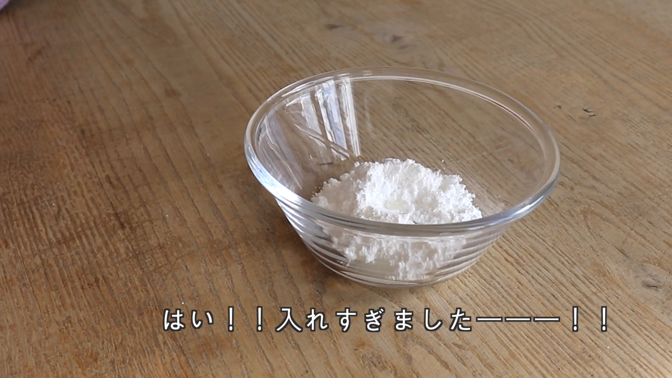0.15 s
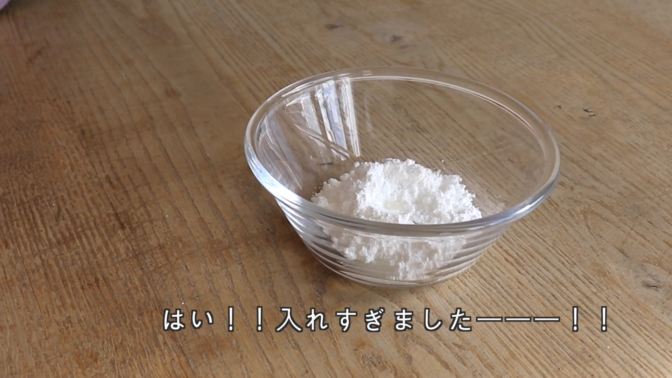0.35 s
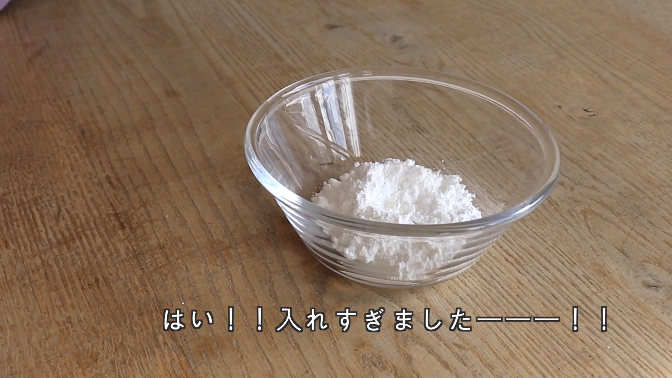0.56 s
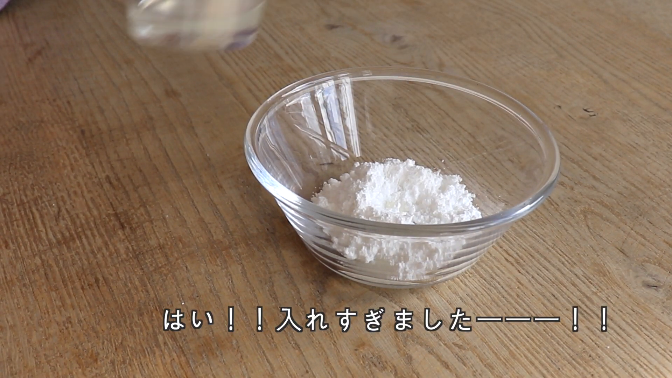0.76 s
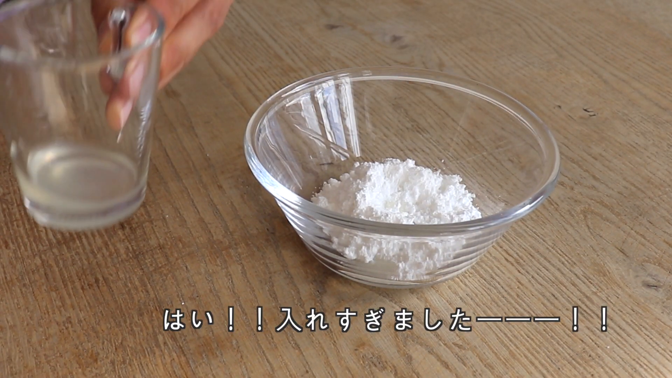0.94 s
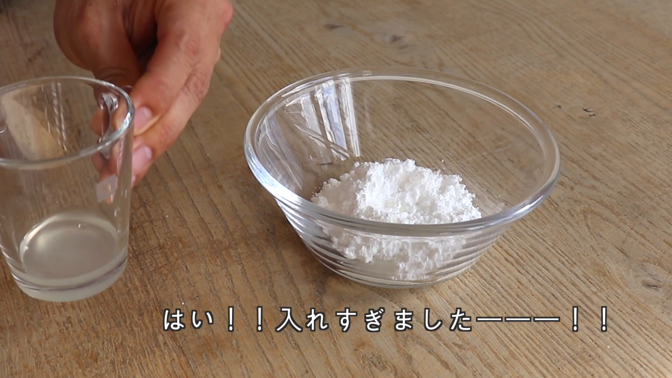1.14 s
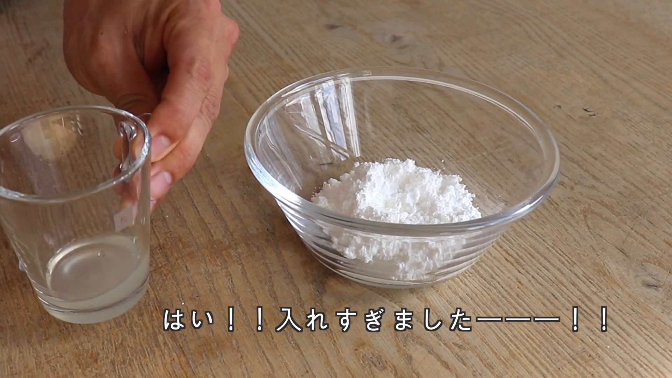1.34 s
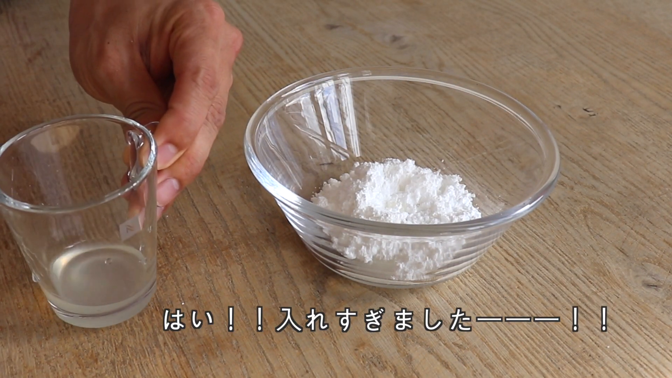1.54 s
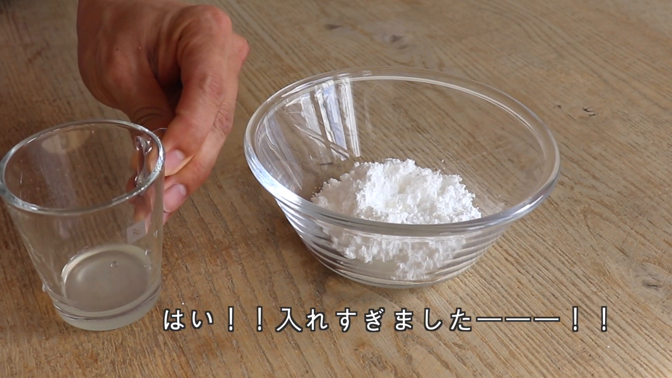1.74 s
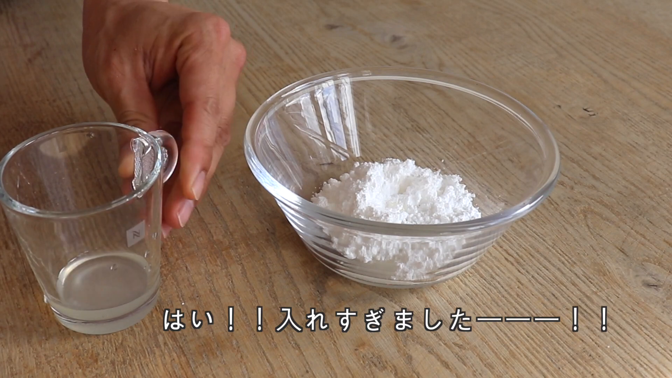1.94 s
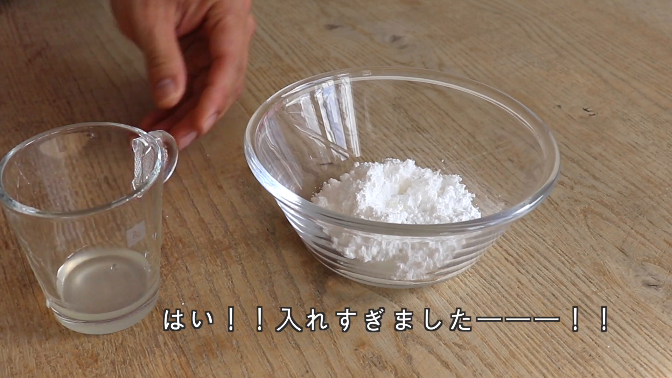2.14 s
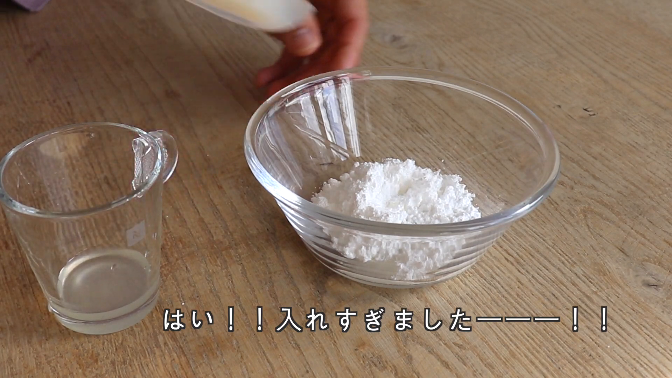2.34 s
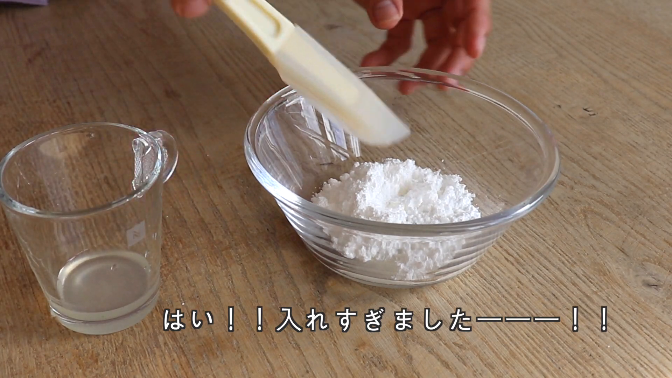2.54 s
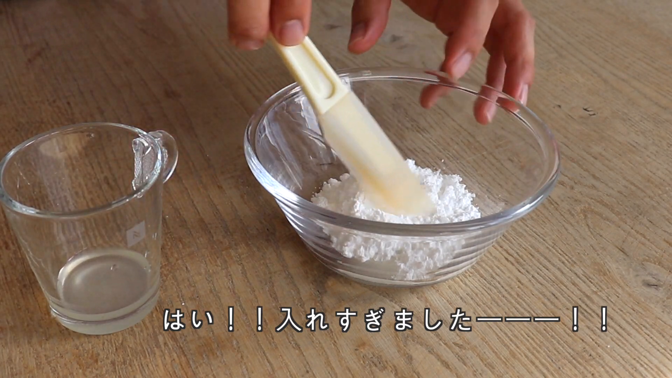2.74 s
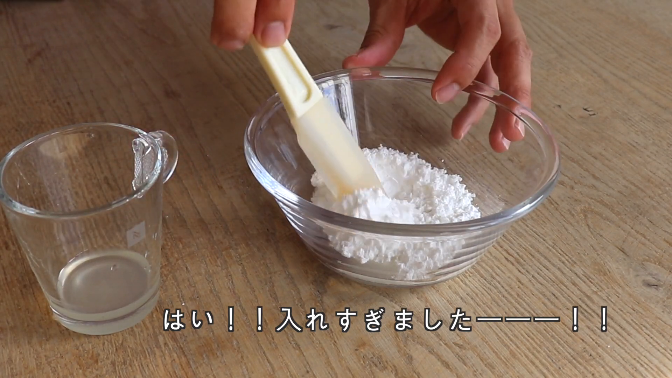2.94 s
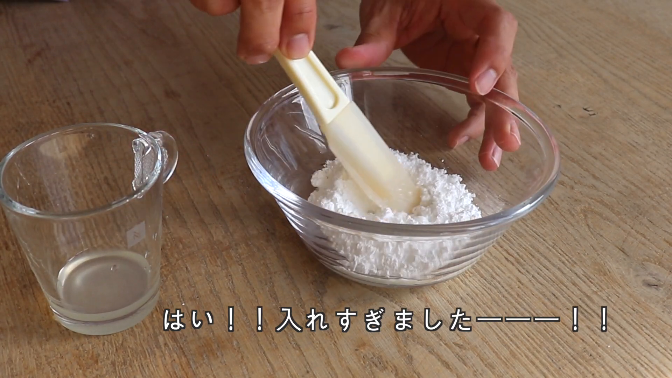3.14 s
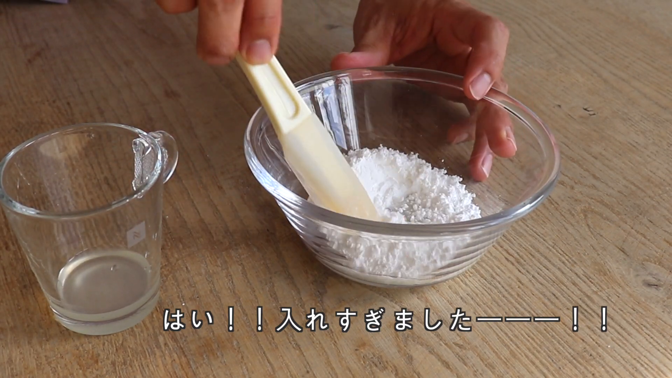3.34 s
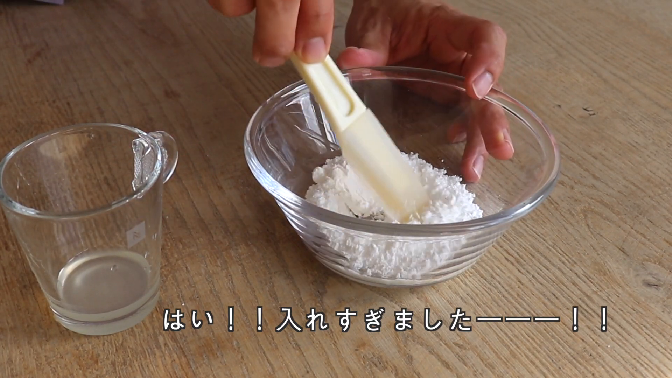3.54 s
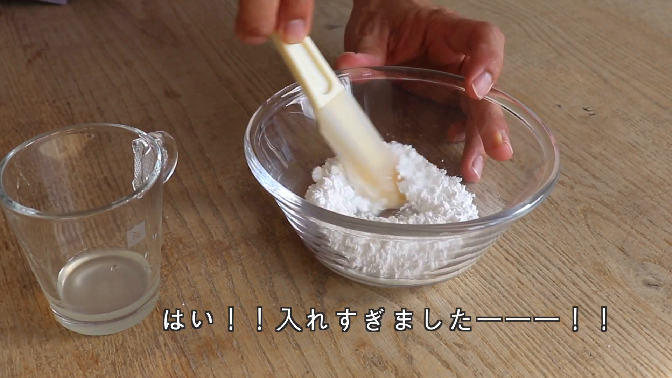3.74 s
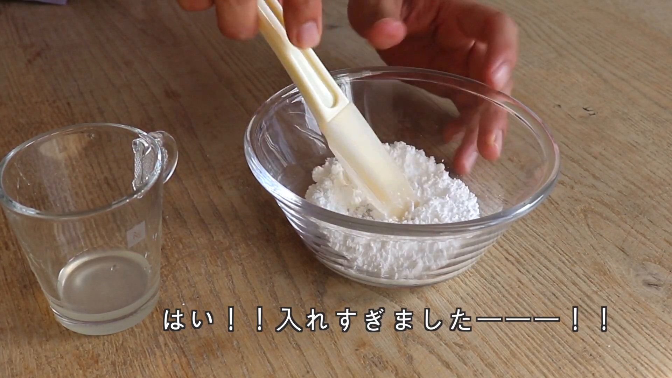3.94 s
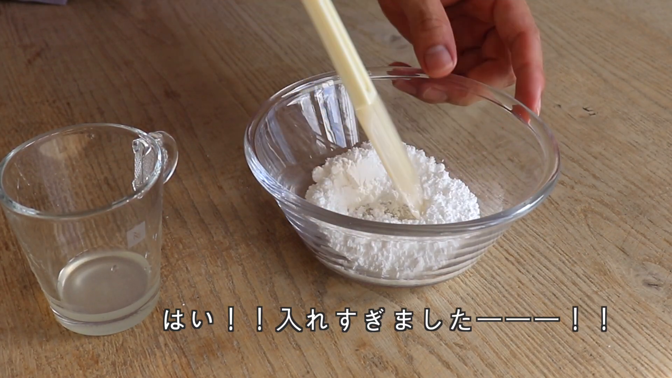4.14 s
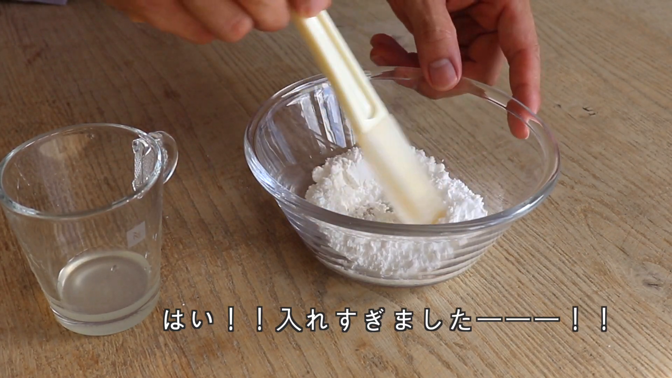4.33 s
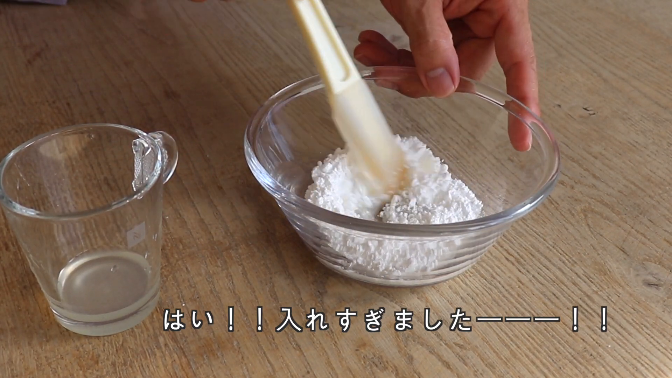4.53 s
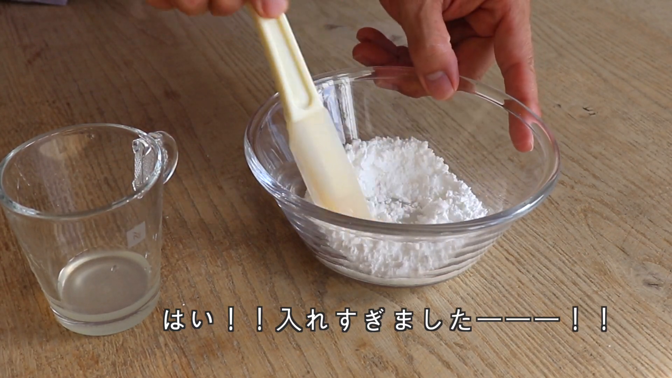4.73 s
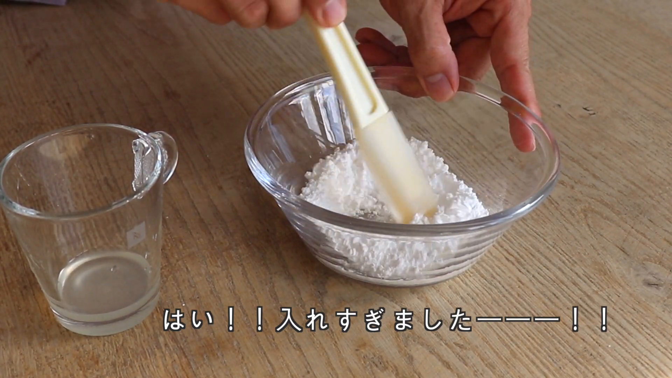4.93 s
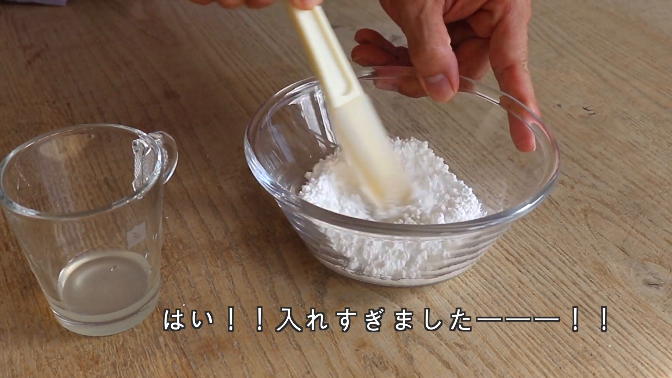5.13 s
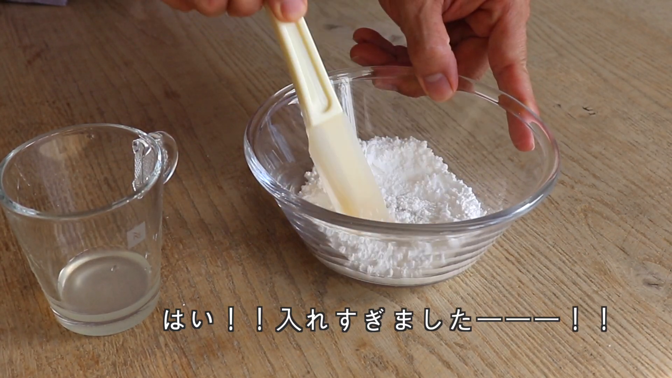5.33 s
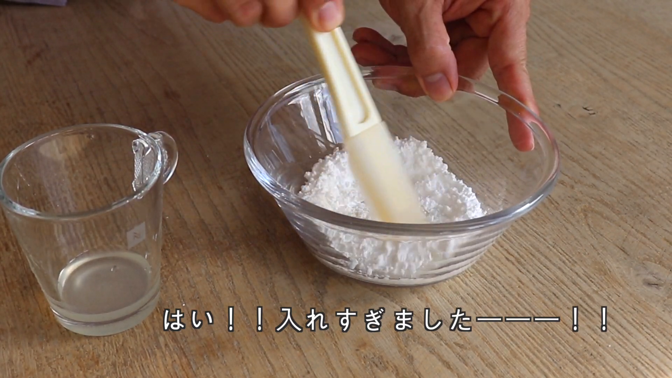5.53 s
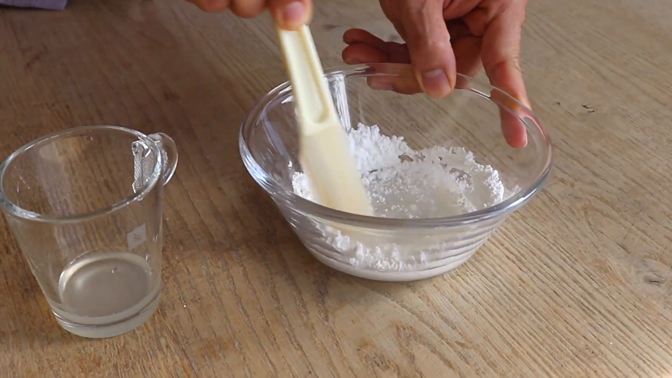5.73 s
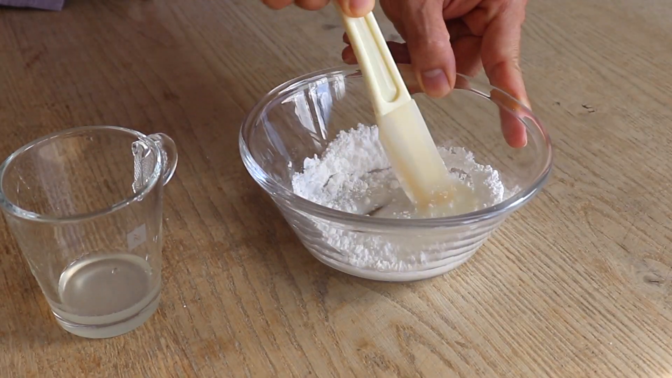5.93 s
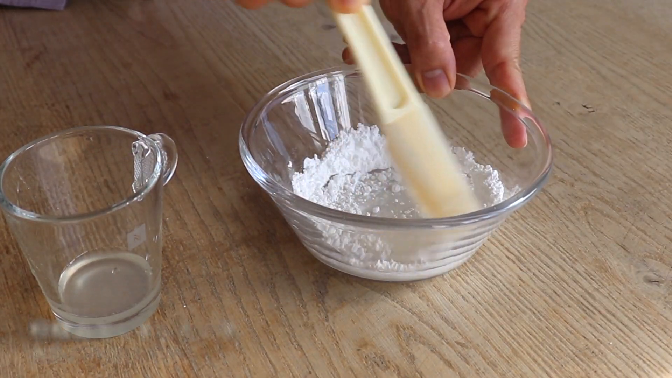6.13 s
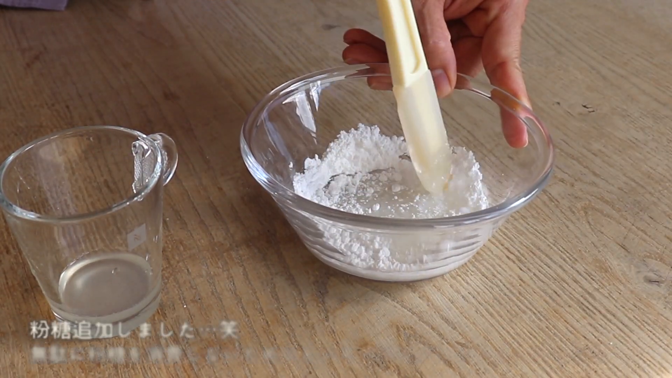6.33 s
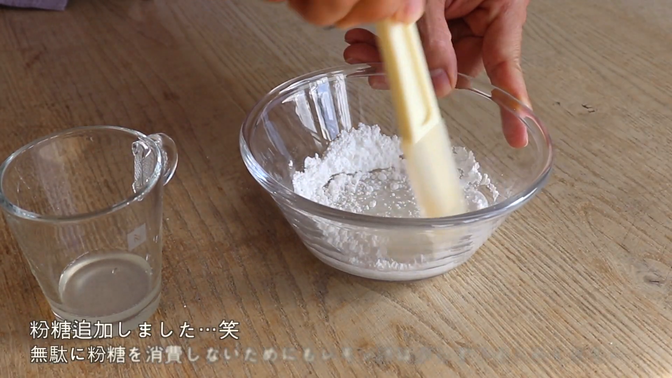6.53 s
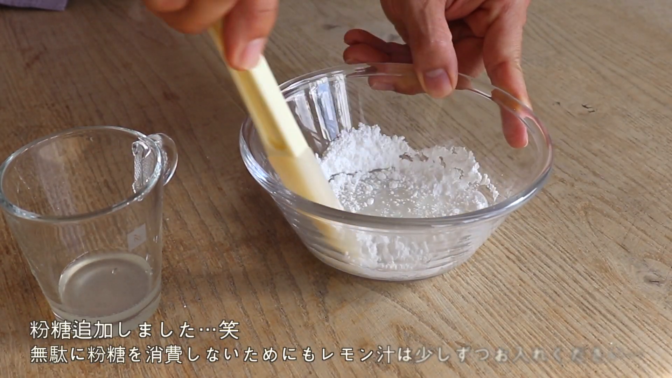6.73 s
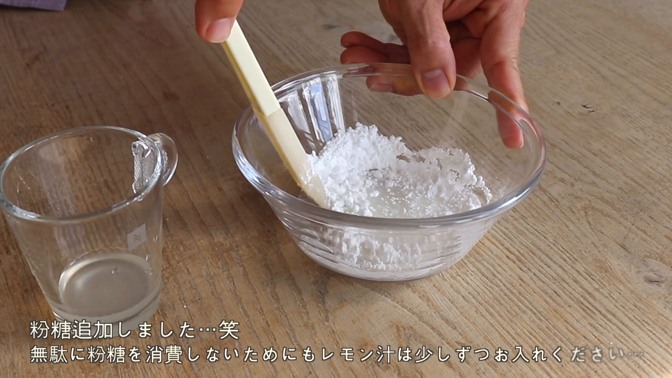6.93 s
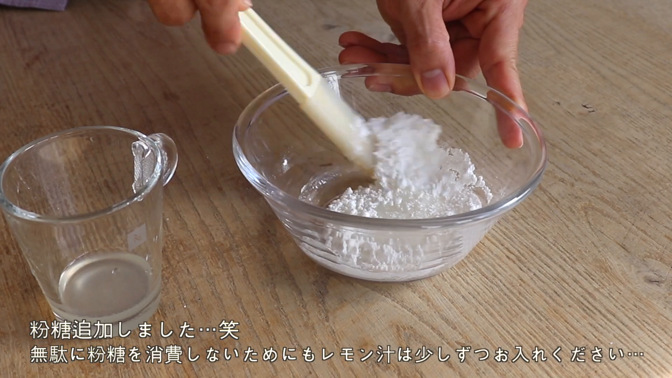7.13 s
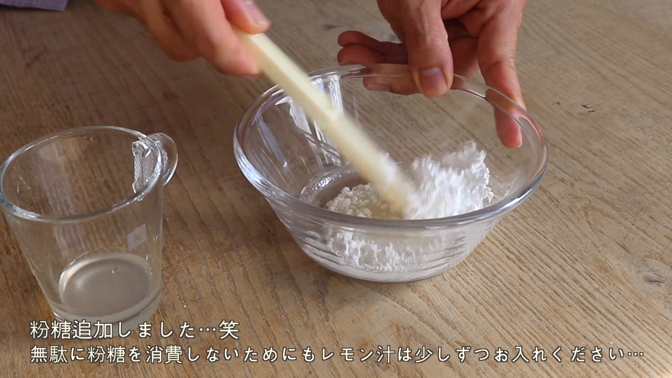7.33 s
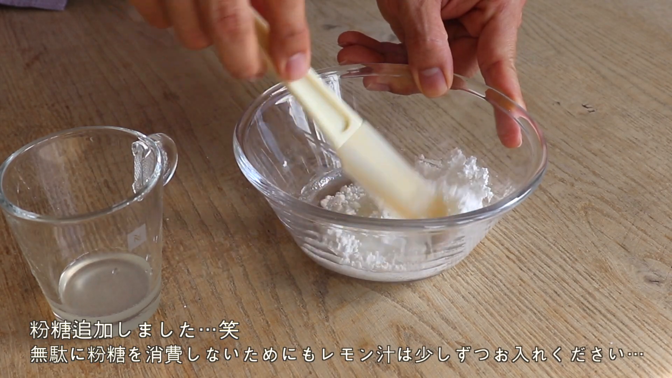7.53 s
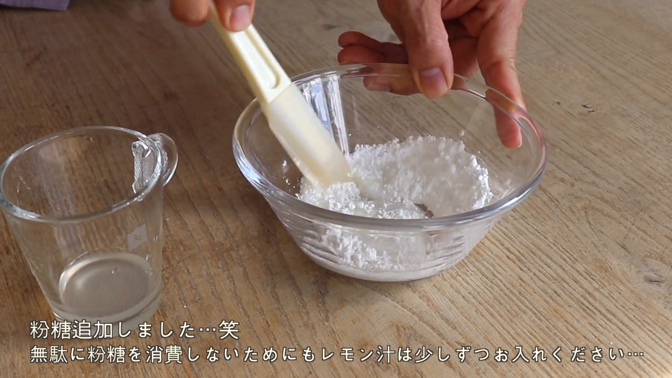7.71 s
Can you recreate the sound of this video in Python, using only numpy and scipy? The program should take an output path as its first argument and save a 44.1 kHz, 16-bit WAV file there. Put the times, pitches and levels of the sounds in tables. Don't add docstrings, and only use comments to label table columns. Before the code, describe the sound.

A quiet kitchen, heard close in stereo, with soft air and a low, swelling outside rumble; a faint motor hum is clearest from 0.9 to 1.6 seconds. At 1.7 a glass cup knocks on a wooden table, rocks faintly and settles by 1.86. Hands brush the wood at 2.1 and 2.6, with quick hissing swipes near 2.85 over a dull sleeve rustle fading past 3. A faint far trill sits around 3, a thin high warble at 3.5 to 3.75, then short, echoing bird chirps until 5.6. The rumble cuts off at 5.75. From 5.8 a plastic spatula works dry sugar in a glass bowl: soft grit, fine fizz, crisp ticks and brief scrapes, with stronger strokes near 6.3, 6.9 and 7.25. The bowl knocks lightly at 6.3 and 6.9. At 7.76 a short, hand-damped glass clink and wooden knock end the stirring.

```python
import sys
import numpy as np
from scipy import signal
from scipy.io import wavfile
from scipy.ndimage import uniform_filter1d

SR = 44100
rng = np.random.default_rng(int(sys.argv[2]) if len(sys.argv) > 2 else 0)


def transcribe(signal):
    frames = np.atleast_2d(signal).T
    limited = np.clip(frames, -1, 1)
    pcm = np.round(limited * 32767).astype(np.int16)
    wavfile.write(sys.argv[1], SR, pcm)


def voltage_ratio(level):
    return 10 ** (np.asarray(level, float) / 20)


N = 347067
T = np.arange(N) / SR

# (frequency [Hz], level [dB], t60 [s])
TABLE_UNDER_CUP = [(248, -16, .27), (282, -5, .42), (323, 2.5, .28), (360, 0, .2), (448, -5, .2),
                   (508, -8, .2), (574, 2, .09), (798, -11, .2), (880, -16, .14), (925, -17, .2),
                   (1084, -15, .18), (410, -9, .06), (614, -1, .02), (682, -14, .08), (750, -13, .055),
                   (1000, -8, .0081), (1200, -17, .1), (1320, -19, .09), (1490, -22, .11), (1655, -23, .1),
                   (1787, -24, .11), (2260, -42, .012), (2700, -36, .04), (4000, -35, .01)]
# (frequency [Hz], level [dB], t60 [s])
TABLE_UNDER_BOWL = [(286, -15.5, 0.16), (386, -5, 0.069), (433, -7, 0.11), (475, -10, 0.11),
                    (570, -4, 0.055), (679, -1, 0.041), (770, -13, 0.0087), (885, -15.5, .08),
                    (928, -7.5, 0.038), (1040, -16, 0.017), (1127, -23, 0.13), (1380, -12.5, 0.019),
                    (2130, -12, 0.02)]
# (time [s], blow [dB], tilt [dB per octave], contact [ms], scatter of the spot [dB])
CUP_KNOCKS = [
    (1.6926, -16, 1.5, 0.11, 0),
    (1.6985, -29.5, 1, 1.23, 2.5),
    (1.717, -33, -1, .8, 3),
    (1.738, -30, 0, 0.8, -2),
    (1.788, -33.5, -3, 0.43, 3),
    (1.8535, -26.5, 7, 0.86, 2.5),
    (1.8597, -25, -5, 0.92, 7.5),
]
# (time [s], blow [dB], tilt [dB per octave], contact [ms], scatter of the spot [dB])
BOWL_KNOCKS = [(5.322, -40, -18, 1.7, 1.2), (6.2995, -36, 8, 0.87, 1.5), (6.3055, -31.5, 3, 0.67, 2.8),
               (6.322, -41.5, -11, 1.26, 2.5), (6.348, -46, 11.5, 0.65, 2.7), (6.69, -61, 12, 1, 1.5),
               (6.6955, -47.5, 9, .6, 1.1), (6.855, -48.5, 5, 0.78, 2.5), (6.872, -49, 10, 0.47, 2.5),
               (6.891, -42.5, 4, 0.59, 2.2), (6.909, -47, 11.5, 0.65, 2.5), (6.918, -36.5, -6, 1.5, 2.4),
               (7.7623, -25, 5.5, 0.49, 2.7), (7.770, -28, 6, 0.46, 2), (7.781, -36, 6.5, .6, 3),
               (7.793, -31, 3, .6, 3)]
# (frequency [Hz], level [dB], t60 [s], left-right [dB], left lead [rad])
BOWL_WALL = [(2535, -2, .02, -12, .5), (4366, -2, .024, 0, .6), (6608, .5, .018, -1, 0),
             (1061, -12, .04, -1, .9), (1800, -9, .006, 3, -.3), (3300, 3, .006, -2, .4),
             (3800, -2, .008, 1, .2), (5700, 7, .0035, 0, 0), (7300, -16, .008, 0, 1.2),
             (8500, -18, .008, -1, 3), (9240, -19, .03, -1, 2.9), (10600, -18, .015, -1, -1.6),
             (11600, -23, .03, 1, 2.2), (13700, -32, .04, -1, 0)]
# (time [s], blow [dB])
CLINKS = [
    (7.7625, -13.5),
]
# (time [s], fall by 20 dB [s], grit [dB], fizz [dB], push on the table [dB])
STIR_STROKES = [(5.81, -1.3, -63, -71, -63), (5.87, -0.2, -62.5, -70, -67), (5.966, 0, -57, -60, -54),
                (6.03, -0.33, -61.5, -61, -70.5), (6.22, -0.2, -61.5, -65, -64),
                (6.314, -0.08, -54.5, -54.5, -41), (6.604, 0.8, -66, -63, -72),
                (6.698, -0.4, -67, -62, -52.5), (6.772, -0.7, -84, -63, -80), (6.89, -0.02, -55, -54, -41),
                (6.93, 0, -61, -55, -44.5), (7.16, 0.44, -58.5, -62.5, -71.5),
                (7.248, 0.08, -54, -60, -44.5), (7.684, 0.3, -63.5, -61, -74)]
# (frequency [Hz], level [dB])
GRIT_COLOUR = [(250, -50), (700, -12), (1500, -1), (2500, 1), (3500, -2), (4600, -6), (7000, -34)]
# (frequency [Hz], level [dB])
FIZZ_COLOUR = [(1000, -50), (3000, -9), (5500, 1), (7000, 3), (11000, -4.5), (15500, -14)]
# (time [s], length [s], centre [Hz], width [Hz], level [dB])
SCRAPES = [(5.845, 0.055, 3600, 2500, -58), (5.927, 0.073, 3100, 1000, -57.5),
           (6.572, .04, 3780, 3000, -62), (6.979, .17, 3500, 350, -64), (7.152, 0.067, 2440, 700, -57),
           (7.199, 0.054, 3480, 800, -59.5), (7.274, 0.069, 2800, 2600, -53.5),
           (7.642, 0.054, 3520, 700, -62)]
# (time [s], level [dB], centre [Hz], width [Hz])
TICKS = [(3.856, -35, 2280, 1800), (5.762, -44, 4740, 1200), (5.969, -47, 13500, 5000),
         (5.9835, -43, 8000, 4000), (6.016, -31, 8200, 5500), (6.025, -47, 9000, 3000),
         (6.027, -47, 8200, 3000), (6.034, -42, 5730, 1500), (6.0342, -53, 11500, 5000),
         (6.042, -43, 1750, 1200), (6.053, -43, 3100, 2000), (6.056, -33.5, 5160, 3500),
         (6.392, -38, 1600, 1600), (6.485, -42, 3000, 2000), (6.8947, -48, 2100, 2500),
         (7.198, -46, 4970, 4000), (7.233, -45, 4000, 3500), (7.428, -50, 3500, 4000),
         (7.651, -52, 12500, 6000), (7.717, -48.5, 11500, 7000), (7.7626, -27, 10500, 3000)]
# (time [s], rise by 20 dB [s], fall by 20 dB [s], hiss [dB], rustle [dB])
HAND_STROKES = [
    (2.096, 0.088, 0.16, -39, -44),
    (2.4, 0.41, 0.94, -58, -49),
    (2.45, 0.074, 0.74, -55.5, -46),
    (2.609, 0.051, 0.2, -38, -39),
    (2.744, 0.061, 0.06, -49.5, -56),
    (2.818, 0.013, 0.16, -41.5, -66),
    (2.85, 0.059, 0.13, -39.5, -60),
    (2.98, 0.26, 0.9, -57.5, -57),
    (3.5, 0.67, -0.7, -75, -60.5),
]
# (frequency [Hz], level [dB])
SKIN_COLOUR = [(500, -52), (2000, -14.5), (3500, -4.5), (4440, 0.5), (5600, -5), (9650, -13),
               (13000, -20.5), (15500, -25)]
# (frequency [Hz], level [dB])
CLOTH_COLOUR = [(120, -51), (250, 1), (500, 3), (900, -2.5), (1700, -1.5), (2600, -5.5), (4000, -16),
                (9000, -53)]
# (time [s], pitch [Hz], level [dB])
WARBLE = [(3.45, 8100, -73), (3.525, 8700, -63.5), (3.565, 8470, -66), (3.62, 9180, -67),
          (3.652, 8800, -63), (3.675, 9150, -66), (3.705, 8920, -64), (3.726, 9400, -77.5),
          (3.757, 8600, -55)]
# (time [s], length [s], middle pitch [Hz], level [dB])
FALLING_NOTES = [(3.833, 0.035, 4700, -55), (3.851, 0.038, 3980, -51.5), (3.914, 0.031, 4060, -50),
                 (3.95, 0.018, 4250, -57), (4.217, 0.027, 4035, -51.5), (4.289, 0.025, 3470, -56.5),
                 (4.35, 0.019, 3550, -57), (4.798, 0.027, 5370, -51.5), (5.036, 0.012, 4500, -60),
                 (5.097, 0.021, 4500, -48), (5.232, 0.033, 6175, -61), (5.288, 0.013, 4500, -56),
                 (5.342, 0.017, 5200, -52), (5.515, 0.02, 5400, -60.5)]
# (time [s], length [s], middle pitch [Hz], level [dB])
SAGGING_NOTES = [(3.838, 0.023, 5570, -56.5), (3.886, 0.02, 4535, -53), (3.979, 0.034, 4110, -47),
                 (4.146, 0.036, 4515, -59), (4.289, 0.018, 4110, -52), (3.915, .015, 4600, -58),
                 (4.76, 0.059, 6480, -60), (5.067, 0.029, 4940, -52), (5.127, 0.038, 4890, -55),
                 (5.257, 0.045, 5640, -53), (5.363, 0.022, 5140, -59), (5.535, 0.026, 4990, -58.5),
                 (5.558, 0.034, 5560, -56.5)]
# (time [s], length [s], middle pitch [Hz], level [dB])
LIFTING_NOTES = [(3.986, 0.034, 4560, -52), (4.124, .015, 4520, -54), (4.053, 0.017, 4675, -51.5),
                 (4.74, 0.031, 5815, -63), (4.783, 0.016, 5500, -57), (4.804, 0.02, 6080, -61),
                 (4.821, .02, 5390, -52), (5.455, 0.014, 5180, -62)]
# (time [s], length [s], middle pitch [Hz], level [dB])
RISING_NOTES = [(4.655, 0.036, 3060, -60.5)]
# (time [s], length [s], middle pitch [Hz], level [dB])
HELD_NOTES = [(3.345, .03, 8720, -72), (.408, 0.042, 2400, -67), (4.061, 0.043, 4960, -56.5),
              (5.275, .015, 4960, -56), (4.245, .02, 3630, -55), (4.42, 0.058, 2445, -63),
              (4.491, 0.12, 2403, -65), (4.725, 0.024, 6775, -67), (4.829, .028, 5125, -60),
              (5.04, 0.032, 3945, -47.5), (5.12, 0.024, 4350, -54), (5.291, 0.03, 5600, -50),
              (5.323, 0.017, 5130, -51), (5.39, 0.034, 4545, -62)]
# (phrase start [s], roughness [0-1])
HOARSENESS = [(0, 0.45), (3.82, 0.47), (4.04, 0.15), (4.2, 0.65), (4.4, 0.2), (4.64, 0.7), (4.71, .4),
              (5.0, 0.22), (5.21, 0.33), (5.5, 0.4)]
# (time [s], length [s], pitch [Hz], level [dB])
FAR_TRILL = [(2.88, 0.71, 4120, -64.5), (2.95, 0.47, 5700, -67), (2.949, 0.46, 5050, -68),
             (3.0, 0.31, 2500, -66.5)]
# (frequency [Hz], width [Hz], level [dB])
KITCHEN_MODES = [(140.4, 11, -3), (195.5, 22, -14.5), (221.8, 5.5, -0.5), (246.7, 5.5, 2), (313.3, 6.1, -7),
                 (349, 5.1, -5.5), (383.6, 7.3, -17.5)]
# (time [s], level [dB])
RUMBLE_SWELLS = [(.03, -42), (.156, -48), (.338, -46.5), (.848, -41.5), (2.41, -38.5), (2.64, -43.5),
                 (2.88, -40.5), (4.1, -46.5), (5.12, -52), (5.72, -48.5)]
# (time [s], level [dB])
MOTOR_LEVEL = [(0, -65), (.75, -64), (.92, -51.5), (1.6, -50.5), (1.72, -56.5), (7.9, -73)]
# (frequency [Hz], level [dB])
MOTOR_LINES = [(85, 1.5), (170, -5.5), (193, 1)]
# (time [s], level [dB])
FLOOR_SHUDDER = [(1.95, -73), (2.1, -53), (2.22, -51), (2.35, -55), (2.5, -75)]
# (frequency [Hz], level [dB per Hz])
AIR_COLOUR = [(15, -35), (25, 7.5), (137, -2), (234, -7.5), (291, -6.5), (618, -13.5), (688, -12),
              (878, -14), (1150, -15), (1590, -17.5), (1770, -17), (3470, -20.5), (8220, -26),
              (15700, -33.5)]
# (time [s], level [dB])
TRAFFIC_LULL = [(0, 0), (6.4, 0.5), (7.2, -6), (7.55, -2.5), (7.9, 1)]
# (frequency [Hz], likeness [0-1])
LIKENESS = [(40, 1), (300, 0.59), (1000, 0.36), (3000, 0.14), (8000, 0.11), (15000, 0.17)]
# (frequency [Hz], t60 [s])
ROOM_DECAY = [(200, 0.44), (600, 0.45), (2000, 0.66), (6000, 0.42), (14000, 0.26)]
# (frequency [Hz], t60 [s])
YARD_DECAY = [(2000, 1), (5000, 0.67), (9000, 0.53)]


def evened(x):
    return x / np.sqrt(np.mean(x ** 2) + 1e-20)


def read(points, hz):
    f, value = np.transpose(points)
    return np.interp(np.log(hz + 1), np.log(f + 1), value)


def level(rows, column=1):
    rows = np.array(rows)
    return voltage_ratio(np.interp(T, rows[:, 0], rows[:, column], -140, -140))


def add(mix, s, sound):
    part = mix[round(s * SR):][:len(sound)]
    part += sound[:len(part)]


def resonate(x, hz, width):
    r = np.exp(-np.pi * width / SR)
    return signal.lfilter([1 - r, 0, r - 1], [1, -2 * r * np.cos(2 * np.pi * hz / SR), r * r], x)


def resonate_twice(x, hz, width):
    return resonate(resonate(x, hz, width), hz, width)


def strokes(s, rise_s, fall_s, db):
    power = np.zeros(N)
    for at, rise, fall, top_db in np.broadcast(s, rise_s, fall_s, db):
        first = max(round((at - 3 * rise) * SR), 0)
        t = T[first:round((at + 3 * fall) * SR)] - at
        add(power, first / SR, voltage_ratio(top_db - 20 * np.maximum(-t / rise, t / fall)) ** 2)
    return np.sqrt(power)


def widen(first, second, hz, likeness):
    same = np.clip(likeness * read(LIKENESS, hz), 0, 1)[:, None]
    return np.array([first, same * first + np.sqrt(1 - same ** 2) * second])


def noise(spectrum, likeness, patchy_db, flicker_db, size, span_s=(0, 8)):
    first, last = round(span_s[0] * SR), min(round(span_s[1] * SR), N)
    frames = (last - first) // (size // 4) + 5
    hz = np.fft.rfftfreq(size, 1 / SR)
    a, b, c, d, patches = rng.standard_normal((frames, len(hz), 5)).T
    patches = uniform_filter1d(patches, size=8, axis=0)
    patches = evened(uniform_filter1d(patches, size=12, axis=1))
    z = widen(a + 1j * b, c + 1j * d, hz, likeness)
    flicker = flicker_db * rng.standard_normal(frames)
    z = z * voltage_ratio(read(spectrum, hz)[:, None] + patchy_db * patches + flicker)
    sound = signal.istft(z, nperseg=size, noverlap=size * 3 // 4)[1][:, :last - first]
    return np.pad(evened(sound), ((0, 0), (first, N - last)))


def echoes(x, decays, gap_s, likeness):
    taps = np.zeros((2, SR))
    at = np.arange(0, SR - 20, 20) + rng.integers(0, 20, (2, (SR - 1) // 20))
    np.put_along_axis(taps, at, rng.choice([-1., 1.], at.shape), 1)
    hz, t, z = signal.stft(taps, SR, nperseg=256)
    z = widen(z[0], z[1], hz, likeness)
    tail = signal.istft(z * voltage_ratio(-60 * t / read(decays, hz)[:, None]), SR, nperseg=256)[1]
    tail = np.pad(tail, ((0, 0), (round(gap_s * SR), 0)))
    return signal.fftconvolve(x[None], tail / np.linalg.norm(tail[0]), axes=1)[:, :N]


def ring(modes, tilt_db=0, scatter_db=0, pan_db=0, lead=0):
    t = np.arange(SR // 2) / SR
    hz, db, t60 = np.array(modes)[:, :3].T[:, :, None]
    spot = rng.standard_normal(hz.shape)
    sense = np.where(hz < 700, 1, (-1) ** np.arange(len(modes))[:, None])
    struck_db = db + tilt_db * np.log2(hz / 500) + scatter_db * spot
    dying = sense * voltage_ratio(struck_db - 60 * t / np.maximum(t60, .002))
    sides = []
    for side in (1, -1):
        waves = np.sin(2 * np.pi * hz * t + side * lead / 2)
        sides.append((dying * voltage_ratio(side * pan_db / 2) * waves).sum(0))
    return np.array(sides)


def knocks(rows, modes):
    out = np.zeros((N, 2))
    khz = np.clip(np.array(modes)[:, :1] / 1000 - .4, 0, 2)
    pan, lead = khz * rng.uniform(-0.89, 1, (2, len(modes), 1))
    spread_db, spread_rad = 6, .7
    for s, db, tilt_db, contact_ms, scatter_db in rows:
        push = np.hanning(max(round(contact_ms * SR / 1000), 1) + 2)[None]
        sound = ring(modes, tilt_db, scatter_db, spread_db * pan, spread_rad * lead)
        add(out, s, voltage_ratio(db) * signal.oaconvolve(sound, push / push.sum()).T)
    return signal.sosfilt(signal.butter(8, 250, "high", fs=SR, output="sos"), out.T)


def cup_on_table():
    rests_s, damping_db_per_s = 1.827, 65
    damping = voltage_ratio(-damping_db_per_s * np.maximum(T - rests_s, 0))
    return knocks(CUP_KNOCKS, TABLE_UNDER_CUP) * damping * voltage_ratio([[.8], [-.8]])


def bowl_on_table():
    return knocks(BOWL_KNOCKS, TABLE_UNDER_BOWL) * voltage_ratio([[.3], [-.3]])


def clinks():
    out = np.zeros((N, 2))
    pan_db, lead = np.array(BOWL_WALL)[:, 3:].T[:, :, None]
    after_db, after_slower = -24, 9
    free = np.array(BOWL_WALL)[:3, :3] * [1, 1, after_slower] + [0, after_db, 0]
    onset = 1 - np.exp(-T[:SR // 2] / .0003)
    for s, db in CLINKS:
        wall = ring(BOWL_WALL, 0, 0, pan_db, lead) + ring(free, 0, 0, pan_db[:3] / 2, lead[:3])
        add(out, s, (voltage_ratio(db) * wall * onset).T)
    return out.T


def stir():
    s, fall_s, *layers_db = np.transpose(STIR_STROKES)
    fall_s = abs(fall_s)
    rise_s = 0.69 * fall_s
    gritty, fizzy, pushed = (strokes(s, rise_s + 0.014, fall_s + 0.014, db) for db in layers_db)
    span_s = (5.78, 7.74)
    grit = gritty * noise(GRIT_COLOUR, 2.8, patchy_db=2.0, flicker_db=0.5, size=256, span_s=span_s)
    fizz = fizzy * noise(FIZZ_COLOUR, 1.0, patchy_db=2.5, flicker_db=3.0, size=256, span_s=span_s)
    slips = rng.standard_normal(N) * (rng.random(N) < 2500 / SR)
    rock = np.zeros(N)
    for hz, db, _ in TABLE_UNDER_BOWL:
        rock += voltage_ratio(db - 7.3 * np.log2(hz / 500)) * resonate(resonate(slips, hz, 85), hz, 510)
    return voltage_ratio(3) * grit + scrapes() + fizz + voltage_ratio(-6.5) * pushed * evened(rock)


def scrapes():
    out = np.zeros(N)
    for s, length, hz, width, db in SCRAPES:
        drag = evened(resonate_twice(rng.standard_normal(round(length * SR)), hz, width))
        add(out, s, voltage_ratio(db) * drag * signal.windows.tukey(len(drag), .5))
    return out


def ticks():
    out = np.zeros(N)
    for s, db, hz, width in TICKS:
        snap = rng.standard_normal(300) * np.exp(-np.arange(300) / (0.00074 * SR))
        snap = resonate_twice(snap, hz, width)
        add(out, s, voltage_ratio(db) * snap / abs(snap).max())
    return out


def hands():
    s, rise_s, fall_s, hiss_db, rustle_db = np.transpose(HAND_STROKES)
    span_s = (1.95, 3.7)
    hiss = noise(SKIN_COLOUR, 0.24, patchy_db=2.0, flicker_db=1.0, size=256, span_s=span_s)
    rustle = noise(CLOTH_COLOUR, 1.0, patchy_db=1.5, flicker_db=0.0, size=256, span_s=span_s)
    return strokes(s, rise_s, fall_s, hiss_db) * hiss + strokes(s, rise_s, fall_s, rustle_db) * rustle


def warble():
    s, pitch, _ = np.transpose(WARBLE)
    phase = 2 * np.pi * np.cumsum(np.interp(T, s, pitch)) / SR
    return voltage_ratio(5) * level(WARBLE, column=2) * np.sin(phase) * np.clip((s[-1] - T) / 0.0054, 0, 1)


def chirps():
    out = np.zeros(N)
    rise_s, fade_s = 0.003, 0.0076
    kinds = ((FALLING_NOTES, -0.144), (SAGGING_NOTES, -0.047), (LIFTING_NOTES, 0.056),
             (RISING_NOTES, 0.32), (HELD_NOTES, .001))
    for notes, glide in kinds:
        for s, length, middle_hz, db in notes:
            hz = middle_hz * (1 + glide * (np.sqrt(np.linspace(0, 1, round(length * SR))) - .5))
            t = T[:len(hz)]
            shape = np.minimum(np.minimum(t / rise_s, (length - t) / fade_s), 1)
            add(out, s, voltage_ratio(db + 6.5) * np.sin(2 * np.pi * np.cumsum(hz) / SR) * shape)
    return out


def trill():
    out = np.zeros(N)
    for s, length, hz, db in FAR_TRILL:
        fuzz = evened(resonate_twice(rng.standard_normal(round(length * SR)), hz, 250))
        add(out, s, voltage_ratio(db) * fuzz * signal.windows.tukey(len(fuzz), .3))
    return out


def birds():
    flutter = uniform_filter1d(rng.standard_normal(N), size=60)
    flutter = evened(uniform_filter1d(flutter, size=60))
    starts, roughness = np.transpose(HOARSENESS)
    rough = np.clip(roughness[np.searchsorted(starts, T, "right") - 1], 0, 1)
    near = warble() + chirps()
    near = near * (np.sqrt(1 - rough ** 2) + rough * flutter)
    broken = .92 + .4 * np.roll(flutter, SR // 3)
    return near + broken * echoes(voltage_ratio(-6) * near + trill(), YARD_DECAY, .008, 9)


def rumble():
    drive = rng.standard_normal((len(KITCHEN_MODES) + 1, N))
    waves = sum(voltage_ratio(db) * evened(resonate(v, hz, w)) for (hz, w, db), v in zip(KITCHEN_MODES, drive))
    motor = sum(voltage_ratio(db) * evened(resonate(drive[-1], hz, 3.6)) for hz, db in MOTOR_LINES)
    shudder = evened(resonate_twice(drive[-1], 48, 25))
    s, db = np.transpose(RUMBLE_SWELLS)
    start_db, sag_db_per_s, ends_s = -46.5, 0.74, 5.75
    loud = np.hypot(voltage_ratio(start_db - sag_db_per_s * T), strokes(s, 0.33, 0.2, db))
    loud = loud * np.clip((ends_s - T) / 0.029, .03, 1)
    mix = loud * evened(waves) + level(MOTOR_LEVEL) * motor + level(FLOOR_SHUDDER) * shudder
    return mix * voltage_ratio([[.4], [-.4]])


def still_air():
    air = voltage_ratio(-50.5) * noise(AIR_COLOUR, 1, patchy_db=0.42, flicker_db=0, size=2048)
    deep = signal.sosfiltfilt(signal.butter(2, 140, fs=SR, output="sos"), air)
    return air + (level(TRAFFIC_LULL) - 1) * deep


def scene():
    table = cup_on_table() + bowl_on_table()
    table = table + voltage_ratio(-4.5) * echoes(table.mean(0), ROOM_DECAY, 0.004, 1.45)
    wall = clinks()
    wall = wall + voltage_ratio(-11.5) * echoes(wall[1], ROOM_DECAY, 0.0068, 0.24)
    snaps = ticks()
    snaps = snaps + voltage_ratio(-5.0) * echoes(snaps, ROOM_DECAY, .005, .3)
    behind = hands() + birds() + rumble() + still_air()
    return table + wall + stir() + snaps + behind


def band_limit(x):
    return signal.sosfilt(signal.butter(12, 16520, fs=SR, output="sos"), x)


def record(dry):
    edge = signal.firwin(511, 15750, window=("kaiser", 9), fs=SR)
    mix = signal.oaconvolve(dry, edge[None], "same")
    return band_limit(mix)


dry = scene()
out = record(dry)
transcribe(out)
```